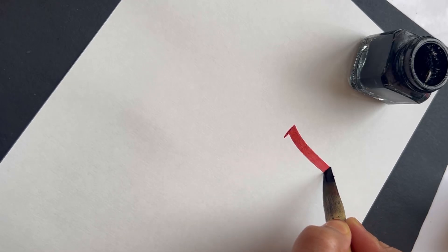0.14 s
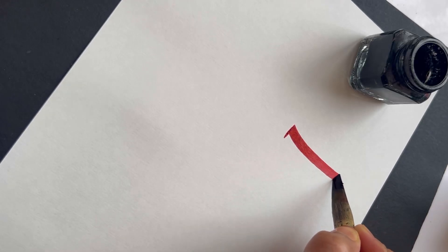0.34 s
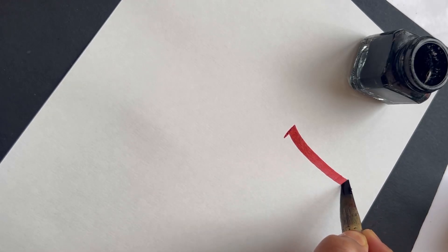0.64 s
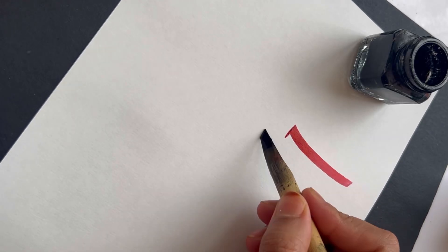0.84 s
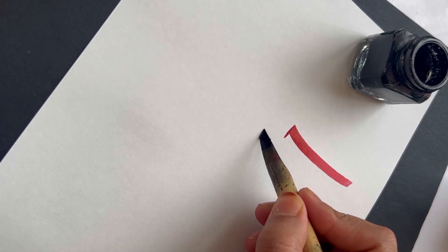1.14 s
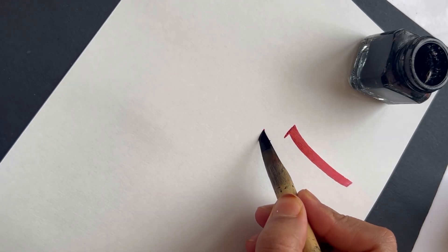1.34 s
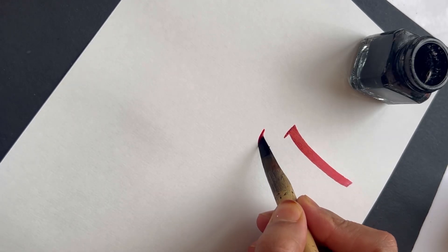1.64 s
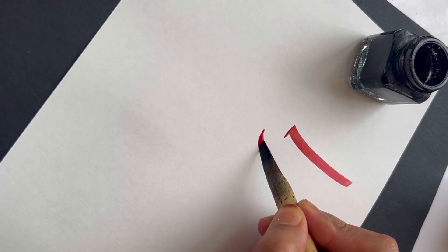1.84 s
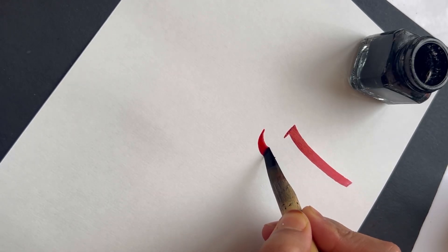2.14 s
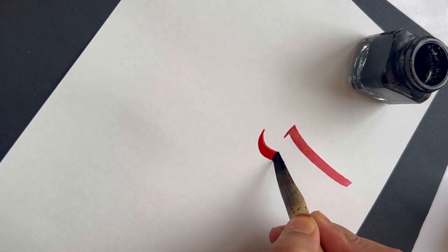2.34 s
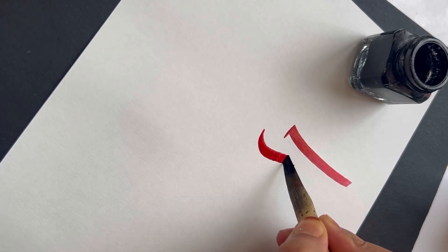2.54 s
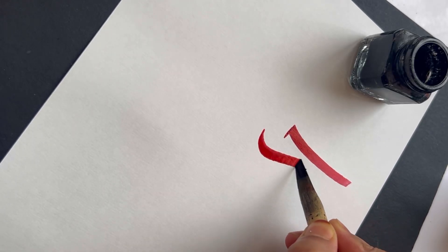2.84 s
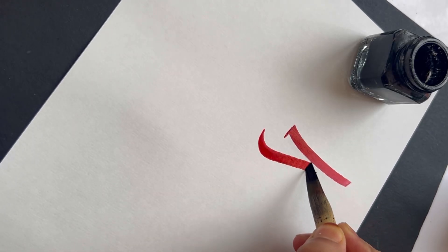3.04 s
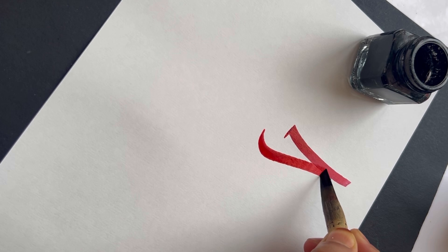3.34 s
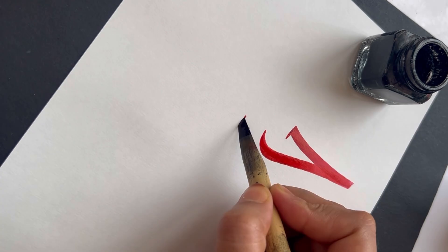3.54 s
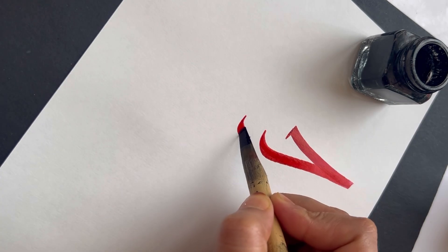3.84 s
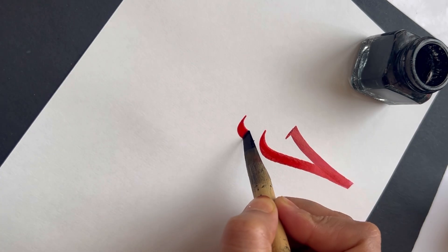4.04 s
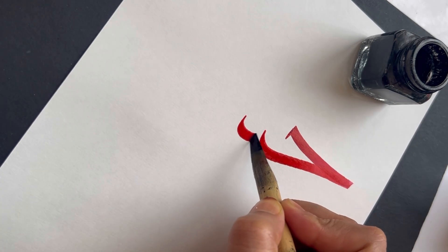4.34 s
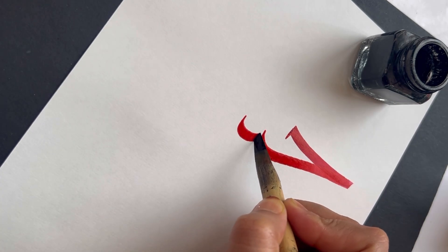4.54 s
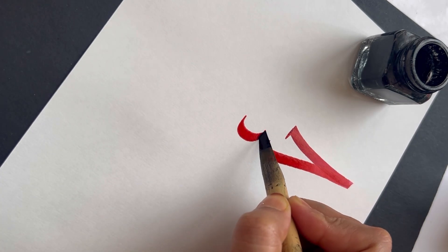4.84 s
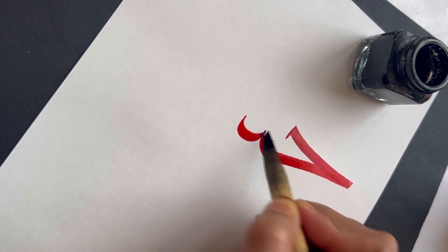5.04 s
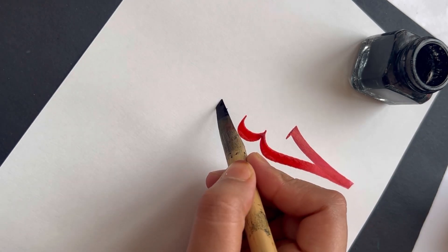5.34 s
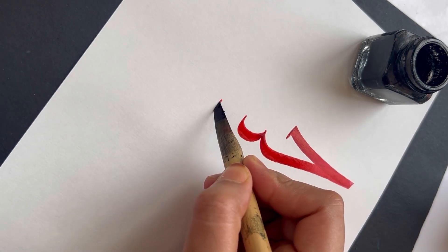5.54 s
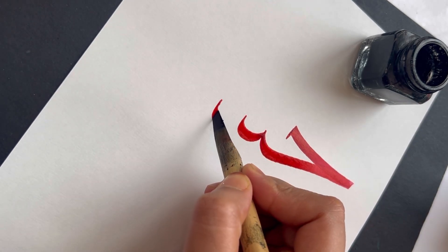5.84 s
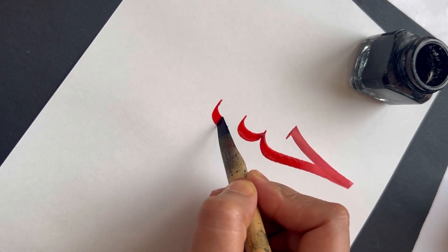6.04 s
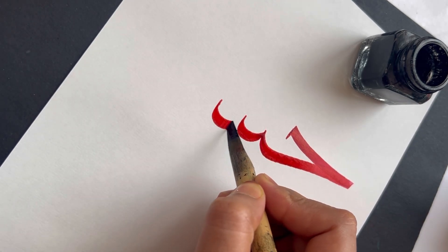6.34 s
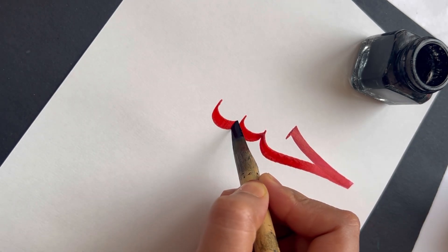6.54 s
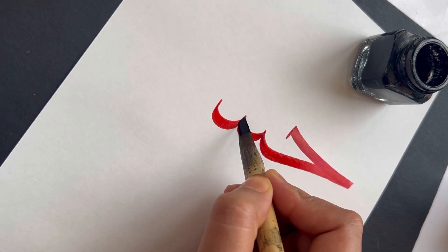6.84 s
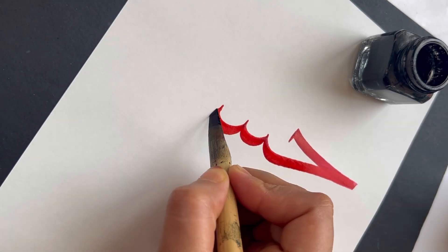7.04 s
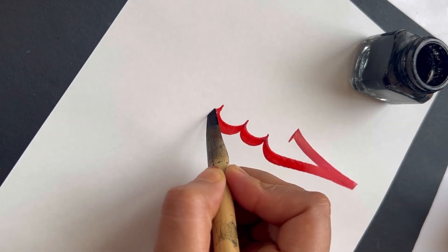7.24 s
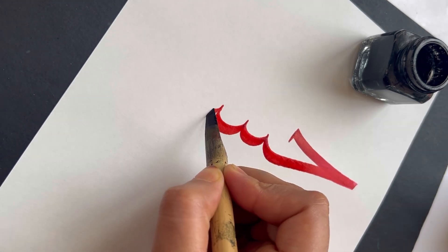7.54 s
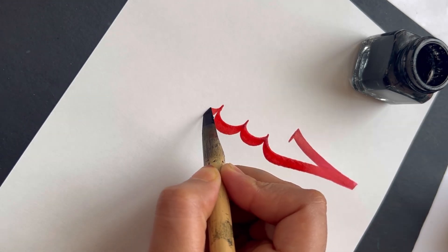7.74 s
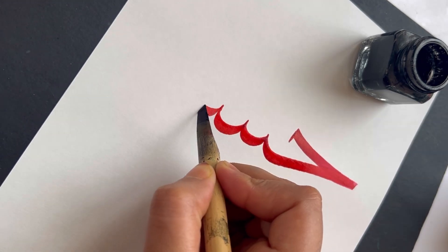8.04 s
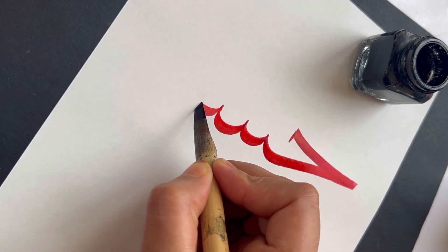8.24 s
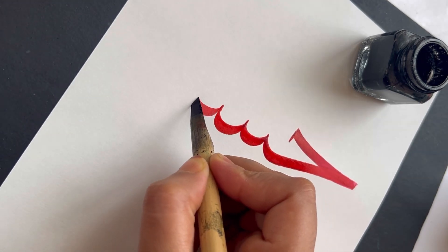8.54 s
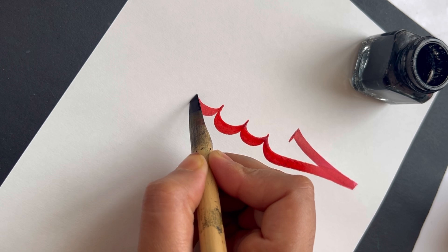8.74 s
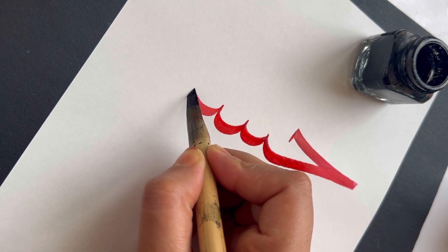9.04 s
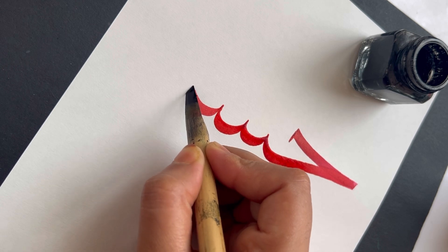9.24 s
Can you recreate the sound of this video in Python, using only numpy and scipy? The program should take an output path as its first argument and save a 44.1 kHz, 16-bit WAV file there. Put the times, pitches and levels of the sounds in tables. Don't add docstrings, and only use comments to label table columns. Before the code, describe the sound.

Close, crisp stick-slip snaps and raspy hisses of a broad wooden nib on paper, first heavy, then lighter and quicker, in a softly humming room.

```python
import sys
import numpy as np
from scipy import signal
from scipy.fft import rfft, irfft, next_fast_len
from scipy.io import wavfile
from scipy.ndimage import map_coordinates

SR = 44100
rng = np.random.default_rng(int(sys.argv[2]) if len(sys.argv) > 2 else 0)


def gain_from_db(level_db):
    decades = np.asarray(level_db, float) / 20
    return 10 ** decades


def to_wav(sig):
    pcm = np.clip(np.atleast_2d(sig), -1, 1) * 32767
    pcm = np.round(pcm).astype(np.int16)
    wavfile.write(sys.argv[1], SR, pcm.T)


N = 414099
TIME = np.arange(N) / SR
SNAP_LAG_S = 0.0007
AIR_TOP_HZ = 13200


def unit(x):
    return x / np.sqrt(np.mean(x ** 2) + 1e-20)


def along(points, hz):
    f, v = np.transpose(points)
    return np.interp(np.log(hz + 1), np.log(f + 1), v)


def wobble(rate_hz):
    knots = rng.standard_normal(int(N * rate_hz / SR) + 4)
    return unit(map_coordinates(knots, [TIME * rate_hz]))


def filtered(x, response):
    m = next_fast_len(N + SR // 2)
    return irfft(rfft(x, m) * response(np.fft.rfftfreq(m, 1 / SR)), m)[..., :N]


def modes(table):
    def response(f):
        total = 0
        for k, (centre, width, db) in enumerate(table):
            damping = 1j * f * width
            total = total + (-1) ** k * gain_from_db(db) * damping / (centre * centre - f * f + damping)
        return total
    return response


def add(track, s, piece):
    part = track[round(s * SR):][:len(piece)]
    part += piece[:len(part)]


def pen():
    strokes = first_stroke() + sweep() + end_stroke() + rebounds() + curls() + flat_strokes() + tail_strokes()
    return strokes + squeak() + drag()


def releases(rows, ring_db, ring_top_db, slide_db):
    s, db = np.transpose(rows)
    ring = -20 * np.log10(gain_from_db(-ring_db) + gain_from_db(db - ring_top_db))
    firm_db, follows = -30, 0.7
    slide = slide_db + follows * (db - firm_db) - db
    return list(zip(s, db, ring, slide))


def slips(table, body, snap_db, rattle_db, rattle_ms, ring, slide_ms, grain):
    blows, rings, slides = np.zeros(N), np.zeros(N), np.zeros(N)
    t = TIME[:SR // 30]
    ring_hz, second, ring_t60_s, scatter = ring
    for s, db, ring_db, slide_db in table:
        start = s + SNAP_LAG_S
        grit = rng.standard_normal((3, len(t)))
        crack = 0.08 * gain_from_db(-60 * t / 0.004) * grit[0]
        crack[0] += 1
        soft_db = 0.3 * (-28 - db)
        pinned = 1 / (1 + (1000 * t / rattle_ms) ** 6)
        rattle = gain_from_db(rattle_db + soft_db - 660 * t) * pinned * grit[1]
        add(blows, start, gain_from_db(db + snap_db) * (crack + rattle))

        nib_hz = ring_hz * (1 + scatter * grit[2, 0])
        phase = 2 * np.pi * nib_hz * t * (1 - 1.2 * t)
        swing = np.sin(phase) + second * gain_from_db(-0.8 * soft_db) * np.sin(2 * phase)
        attack = 1 - np.exp(-t / 0.0011)
        add(rings, start, gain_from_db(db + ring_db + 3.5 - 60 * t / ring_t60_s) * attack * swing)

        u = np.linspace(0, 1, int(slide_ms * SR / 1000))
        slowing = gain_from_db(-4 * u) * np.cos(np.pi / 2 * u) ** 1.3
        add(slides, start, gain_from_db(db + slide_db) * slowing)

    radiated = filtered(blows, lambda hz: modes(body)(hz) / np.sqrt(1 + (hz / 15240) ** 24))
    return radiated + rings + slides * fibres(grain)


# (time [s], snap peak [dB])
FIRST = [
    (0.2299, -20),
    (0.3446, -18.5),
    (0.3611, -31),
    (0.3774, -44),
    (0.4352, -15.5),
    (0.5353, -15),
    (0.5495, -25),
    (0.634, -11.5),
    (0.6653, -20.5),
]
# (centre [Hz], width [Hz], level [dB])
BODY_FIRST = [(2923, 1120, -18), (4380, 330, -15.5), (5520, 860, -8.5), (7150, 360, 0.5), (8970, 530, -4.5),
              (11420, 660, -6), (13500, 1680, -12)]


def first_stroke():
    return slips(releases(FIRST, -22, -26, -63.0), BODY_FIRST, snap_db=18.5, rattle_db=-33.5, rattle_ms=4,
                 ring=(2330, 0.4, 0.033, 0.0088), slide_ms=101, grain=(6700, 700, 8))


# (time [s], snap peak [dB])
SWEEP = [(2.0397, -66), (2.164, -51.5), (2.37, -51), (2.3835, -36), (2.4917, -34), (2.6079, -31),
         (2.7157, -29.5), (2.8274, -30.5), (2.9297, -27.5), (3.043, -54), (3.1313, -62), (3.1622, -56),
         (3.2655, -32), (3.3453, -59), (3.45, -31)]
# (centre [Hz], width [Hz], level [dB])
BODY_SWEEP = [(2790, 440, -1.5), (4520, 420, -13), (5930, 490, 2), (7330, 740, 0), (9300, 480, -0.5),
              (11420, 850, -1.5), (14350, 1260, -8)]


def sweep():
    return slips(releases(SWEEP, -9.0, -12, -58.5), BODY_SWEEP, snap_db=16.5, rattle_db=-25, rattle_ms=3.6,
                 ring=(2340, 0.6, 0.028, 0.0073), slide_ms=113, grain=(7000, 700, 4))


# (time [s], snap peak [dB])
HOOK = [(3.9664, -66), (4.0861, -44), (4.2133, -40), (4.3081, -30), (4.354, -31), (4.4133, -29),
        (4.4567, -41), (4.547, -44), (4.5815, -43.5), (4.6728, -44), (4.7052, -52), (4.7955, -61),
        (4.8329, -62), (5.0584, -67), (5.0888, -60)]
# (time [s], snap peak [dB])
CURL = [(5.441, -55), (5.4794, -57), (5.6121, -63), (6.2437, -26.5), (6.2936, -23.5), (6.3489, -22.5),
        (6.3958, -23), (6.4722, -25.5), (6.5051, -26.5), (6.5909, -33.5), (6.6218, -35), (6.7136, -44.5),
        (6.7411, -52), (6.8114, -59), (6.8398, -59), (6.9865, -61), (7.032, -69), (7.0668, -47),
        (7.1157, -51)]
# (centre [Hz], width [Hz], level [dB])
BODY_MIDDLE = [(2700, 760, -9.5), (4280, 850, -13), (5820, 500, -1), (7630, 1050, -4.5), (8940, 790, -7.5),
               (11140, 800, -7), (13700, 1880, -10.5)]


def curls():
    table = releases(HOOK, -3.2, -28, -65.0) + releases(CURL, -3.5, -30, -65.5)
    return slips(table, BODY_MIDDLE, snap_db=16.5, rattle_db=-20.5, rattle_ms=5.1,
                 ring=(2354, 0.31, 0.022, 0.0066), slide_ms=83, grain=(7000, 700, 4))


# (time [s], snap peak [dB])
BACK = [(7.448, -49), (7.5932, -36.5), (7.6355, -34), (7.7425, -28), (7.7918, -31), (7.864, -27.5),
        (7.9059, -26), (7.9592, -39), (8.003, -29), (8.0477, -26.5), (8.0929, -29), (8.1385, -24),
        (8.1838, -22.5), (8.2278, -25), (8.2713, -30), (8.3198, -35.5), (8.3621, -48), (8.3894, -39.5),
        (8.4109, -40.5), (8.4792, -34.5), (8.5035, -34.5), (8.5232, -50)]
# (centre [Hz], width [Hz], level [dB])
BODY_FLAT = [(3224, 1070, -7), (4670, 540, -0.5), (5910, 540, 9), (7890, 780, 6), (11260, 4600, 5.5),
             (11470, 2070, 10.0), (14010, 830, -8.0)]


def flat_strokes():
    return slips(releases(BACK, 0, -38, -59.5), BODY_FLAT, snap_db=15.5, rattle_db=-34, rattle_ms=5.7,
                 ring=(3690, 0.28, 0.0085, 0.021), slide_ms=53, grain=(5700, 900, 8))


# (time [s], level [dB])
REBOUNDS = [
    (7.871, -39),
    (8.0545, -42),
    (8.1455, -42),
    (8.1895, -39),
    (8.234, -46),
]


def rebounds():
    return slips(releases(REBOUNDS, 0, -38, -77), BODY_FLAT, snap_db=4, rattle_db=-10, rattle_ms=2.3,
                 ring=(3560, 0.05, 0.015, 0.0088), slide_ms=20, grain=(7800, 900, 3))


# (time [s], snap peak [dB])
TAIL = [(8.5812, -51), (8.6197, -33.5), (8.6695, -33.5), (8.7178, -35), (8.7602, -33.5), (8.801, -35),
        (8.843, -34.5), (8.8747, -50), (8.9003, -52), (8.9243, -50), (8.9794, -45), (9.017, -33.5),
        (9.0507, -43.5)]
# (centre [Hz], width [Hz], level [dB])
BODY_TAIL = [(2980, 840, -2.5), (5400, 770, 4), (6800, 1040, 5.5), (7940, 730, 6), (10240, 910, -1.5),
             (11950, 1230, 3.5), (14670, 2410, -2.5)]


def tail_strokes():
    return slips(releases(TAIL, -7, -32, -63.0), BODY_TAIL, snap_db=16.0, rattle_db=-28.5, rattle_ms=2.9,
                 ring=(3600, 0.1, 0.0055, 0.02), slide_ms=54, grain=(7800, 1200, 5))


# (time [s], snap peak [dB])
LAST = [
    (9.1144, -51),
    (9.1561, -30),
    (9.1988, -27),
    (9.2429, -25.5),
    (9.2913, -23),
    (9.3337, -22.5),
    (9.3865, -33),
]
# (centre [Hz], width [Hz], level [dB])
BODY_END = [(3100, 760, -7.5), (5400, 550, -1), (6920, 870, 2.5), (7880, 730, 7), (10240, 910, 0),
            (11930, 1230, 4.0), (14670, 2410, -1.5)]


def end_stroke():
    return slips(releases(LAST, -20, -69, -62.0), BODY_END, snap_db=17.5, rattle_db=-28, rattle_ms=2.4,
                 ring=(3550, 0.1, 0.007, 0.02), slide_ms=50, grain=(7800, 1200, 5))


# (time [s], length [ms], early pitch [Hz], late pitch [Hz], overtones [dB])
CHATTER = [(0.259, 14.7, 2220, 2210, -33.5), (0.272, 8.6, 2243, 2190, -34.5), (0.281, 19, 2057, 2096, -38),
           (0.297, 14.5, 2150, 2250, -33.5), (0.309, 9.7, 2130, 2055, -42.5),
           (0.317, 10.5, 1830, 1750, -50), (0.344, 13.4, 2204, 1990, -41), (0.358, 9, 2213, 2105, -39.5),
           (0.375, 4, 1802, 1730, -45), (0.438, 15, 2200, 2242, -39), (0.45, 19, 2250, 2154, -36.5),
           (0.465, 13, 2154, 2173, -32.5), (0.477, 15, 2064, 2027, -32), (0.491, 5.8, 1846, 1672, -43),
           (0.498, 14, 2083, 2053, -50.5), (0.522, 8, 2057, 2070, -55), (0.536, 11.6, 2300, 2054, -37),
           (0.552, 4.4, 2025, 1800, -34.5), (0.639, 10.5, 2360, 1794, -38.5),
           (0.648, 10.5, 2010, 1940, -42), (0.665, 15, 2225, 2120, -39.5), (0.676, 11.5, 1843, 1800, -48)]


def chatter_rows():
    return [(s, ms, early_hz, late_hz, -57 + 0.28 * (db + 37.5), db, 1)
            for s, ms, early_hz, late_hz, db in CHATTER]


# (time [s], length [ms], start pitch [Hz], fundamental [dB], overtones [dB])
CHIRPS = [(3.03, 8, 2000, -67, -72), (3.125, 6.7, 1950, -67, -72), (3.16, 9.6, 2160, -61.5, -69),
          (3.342, 8.1, 2140, -59, -67), (4.316, 20.4, 2285, -58.5, -53), (4.36, 5.7, 2240, -55, -51),
          (4.458, 8.3, 2330, -55, -66), (4.55, 9, 2330, -62, -69), (4.585, 7.4, 2330, -65, -69),
          (4.676, 6.4, 2330, -69, -69), (6.252, 5.9, 2080, -58, -42), (6.355, 11.4, 2020, -54.5, -47),
          (6.594, 5, 2330, -64, -60), (6.623, 6, 2330, -63, -62), (7.598, 3.3, 2150, -61.5, -66),
          (7.638, 4.5, 2150, -60, -68), (7.745, 4, 2150, -59.5, -62), (7.797, 3.4, 2150, -59, -66),
          (7.868, 8.7, 2090, -60, -60), (7.911, 8, 2090, -59, -52), (7.963, 5.7, 2050, -64, -60),
          (8.008, 2.5, 2050, -59, -46), (8.052, 5.6, 2080, -59, -38), (8.143, 4, 2000, -66, -60)]


def chirp_rows():
    sag_hz, peakiness = 129.5, 3.6
    return [(s, ms, hz, hz - sag_hz, low_db, high_db, peakiness) for s, ms, hz, low_db, high_db in CHIRPS]


# (multiple of pitch, level [dB])
OVERTONES = [(2, -9.5), (3, -0.5), (4, 0), (5, -4.5), (6, -6), (7, -21)]


def squeak():
    s, ms, early_hz, late_hz, low_db, high_db, peaky = np.transpose(chatter_rows() + chirp_rows())
    knots_s = np.ravel([s + ms / 4000, s + 3 * ms / 4000], order="F")
    pitch_hz = np.interp(TIME, knots_s, np.ravel([early_hz, late_hz], order="F"))
    jitter = 0.008 * wobble(220) + 0.02 * wobble(1200)
    phase = 2 * np.pi * np.cumsum(pitch_hz * (1 + jitter)) / SR
    low, high = np.zeros(N), np.zeros(N)
    for start, length_ms, a_db, b_db, power in zip(s, ms, low_db, high_db, peaky):
        swell = np.sin(np.linspace(0, np.pi, int((length_ms + 4) * SR / 1000))) ** 1.7
        add(low, start - 0.002, gain_from_db(a_db + 9.5) * swell)
        add(high, start - 0.002, gain_from_db(b_db + 1) * swell ** power)
    waver_db = 2.6
    stack = sum(gain_from_db(db + waver_db * wobble(250)) * np.sin(k * phase) for k, db in OVERTONES)
    grit = 0.09 * (1 + np.cos(phase)) * fibres((6500, 3000, 3))
    flicker = gain_from_db(1.6 * wobble(300))
    fundamental = np.sin(phase) + 0.26 * np.sin(2 * phase)
    return flicker * (low * fundamental + high * (stack + grit))


# (time [s], length [ms], level [dB])
DRAG = [(0, 124, -60.5), (0.059, 220, -56.5), (.24, 320, -53), (.44, 130, -48), (1.1, 320, -87),
        (2.04, 83, -69.5), (2.14, 350, -71), (2.39, 470, -95), (3.043, 130, -62), (3.132, 200, -63),
        (3.329, 80, -65), (3.78, 260, -79), (3.966, 82, -69), (4.1, 93, -72), (4.781, 84, -77),
        (5.025, 24, -75), (5.525, 28, -79), (6.97, 120, -85), (7.076, 16, -59), (7.65, 110, -81),
        (7.958, 27, -63), (8.41, 140, -80), (7.112, 22, -64), (4.6, 420, -85), (6.62, 460, -83),
        (8.52, 110, -76), (7.75, 870, -75), (8.6, 540, -81), (9.15, 420, -80)]


def drag():
    creep = [(5.615 + k * 0.0964, 160, -88 + 4 * k) for k in range(6)]
    pressure = np.zeros(N)
    for s, ms, db in DRAG + creep:
        u = np.linspace(0, 1, int(ms * SR / 1000))
        add(pressure, max(s, 0), gain_from_db(db) * np.sin(np.pi * u ** 0.5) ** 3.0)
    return pressure * fibres((12000, 2000, 6))


# (frequency [Hz], level [dB])
FIBRES = [(1200, -47), (3000, -6.5), (5000, -4), (6800, -4), (8500, -7.5), (11500, -9), (13600, -12),
          (14150, -27), (15600, -55.5)]


def fibres(grain):
    catches = rng.standard_normal(N) * gain_from_db(1.2 * wobble(900) + 1.2 * wobble(60))
    return unit(filtered(catches, lambda hz: gain_from_db(along(FIBRES, hz)) * (1 + np.abs(modes([grain])(hz)))))


# (frequency [Hz], T60 [s])
ROOM_T60 = [(2000, 0.26), (6000, 0.226), (13500, 0.085), (15000, .03)]


def walls(x, wet_db):
    hz, t, z = signal.stft(rng.standard_normal(SR // 4), SR, nperseg=256)
    decay = gain_from_db(-60 * t / along(ROOM_T60, hz)[:, None])
    tail = signal.istft(z * decay, SR, nperseg=256)[1]
    late = np.pad(x, (250, 0))
    return gain_from_db(wet_db) * signal.fftconvolve(late, tail / np.linalg.norm(tail))[:N]


def fan():
    phase = 2 * np.pi * np.cumsum(75.6 + 0.5 * wobble(4)) / SR
    start_db = -16 * np.clip(1 - TIME / 0.18, 0, 1)
    return gain_from_db(-51 + start_db + 1.8 * wobble(9)) * np.sin(phase)


# (centre [Hz], width [Hz], level [dB])
DUCT_TONES = [(104.1, 3.9, -67.5), (182, 5.7, -63.5)]


def ducts():
    return sum(gain_from_db(db) * unit(filtered(rng.standard_normal(N), modes([(hz, width_hz, 0)])))
               for hz, width_hz, db in DUCT_TONES)


def engine():
    start_s, fade_db_per_s = 0.84, 4.5
    db = -56.5 - fade_db_per_s * (TIME - start_s) + 2.6 * wobble(2.7)
    return (TIME > start_s) * gain_from_db(db) * np.sin(2 * np.pi * 43 * TIME)


# (time [s], length [ms], pitch [Hz], level [dB])
BUMPS = [
    (1.46, 65, 338, -55.5),
    (5.8, 190, 104.6, -52),
]


def bumps():
    track = np.zeros(N)
    for s, ms, hz, db in BUMPS:
        t = TIME[:int(ms * SR / 1000)]
        add(track, s, gain_from_db(db + 5.5) * np.sin(np.pi * t / t[-1]) ** 2 * np.sin(2 * np.pi * hz * t))
    return track


def triple_noise(response):
    return unit(filtered(rng.standard_normal((3, N)), response))


# (frequency [Hz], density [dB per Hz])
AIR = [(30, -91.5), (60, -41.5), (130, -25), (300, -5.5), (660, -14), (780, -25), (1900, -25), (2700, -31),
       (4000, -38), (5200, -47.5), (7500, -56), (13000, -62.5)]
# (centre [Hz], width [Hz], level [dB])
DUCT = [(571, 146, -7), (1071, 190, 2)]


def air():
    def colour(hz):
        return gain_from_db(along(AIR, hz)) * (1 + np.abs(modes(DUCT)(hz))) / (1 + (hz / AIR_TOP_HZ) ** 30)
    swell_db = 0.35 * wobble(1.2) + 0.4 * wobble(6)
    return gain_from_db(-54.5 + swell_db) * triple_noise(colour)


# (frequency [Hz], density [dB per Hz])
RUMBLE = [(30, -120), (55, -6), (62, 4), (105, 1), (135, -1.5), (182, 3), (215, 0), (320, -39),
          (500, -62.5), (800, -120)]


def rumble():
    return gain_from_db(-55) * triple_noise(lambda hz: gain_from_db(along(RUMBLE, hz)))


# (frequency [Hz], density [dB per Hz])
THRUM = [(15, -120), (24, -22), (32, -14), (38, -2), (44, 0), (52, -6), (60, -30), (80, -120)]


def thrum():
    return gain_from_db(-71.5) * triple_noise(lambda hz: gain_from_db(along(THRUM, hz)))


# (frequency [Hz], left lead [rad])
TURN = [(100, 0), (600, -.47), (1050, -.52), (1500, -.3), (2330, 1.63), (2750, 2.16), (3600, 1.0),
        (4900, 1.4), (5770, 3.07), (10200, 9.3), (14850, 15.7), (16100, 17)]


def ports(centre):
    hz_knots, radians = np.transpose(TURN)
    side = np.array([[1], [-1]])
    return filtered(centre, lambda hz: np.exp(0.5j * np.interp(hz, hz_knots, radians) * side))


# (frequency [Hz], share [0-1])
APART = [(60, .02), (250, 0.13), (500, 0.3), (1000, 0.54), (2000, 0.28), (8000, 0.77)]


def own_share(hz):
    return np.clip(along(APART, hz), 0, 0.9)


def scene():
    near = pen()
    echo = filtered(walls(near, wet_db=-25), lambda hz: 1 / (1 + (hz / AIR_TOP_HZ) ** 20))
    shared, *own = air() + rumble() + thrum()
    gone = sum((TIME > s) & (TIME < s + 0.2) for s, _ in CHANGES[:2])
    centre = (near + echo) * (1 - gone) + fan() + ducts() + engine() + bumps()
    centre = centre + filtered(shared, lambda hz: np.sqrt(1 - own_share(hz) ** 2))
    gains = np.array([[1.25], [0.8]])
    return ports(centre) + filtered(np.array(own), lambda hz: own_share(hz) * gains)


def band_limit(x):
    return signal.sosfilt(signal.butter(12, 16800, fs=SR, output="sos"), x)


# (time [s], dip [dB])
CHANGES = [
    (0.735, -10.5),
    (3.52, -13.5),
    (5.09, -11),
    (7.068, -9.5),
]


def record(dry):
    dips_db = sum(db * (TIME > s) * np.clip(1 - (np.abs(TIME - s) / 0.026) ** 2, 0, 1) for s, db in CHANGES)
    heard = filtered(dry * gain_from_db(dips_db), lambda hz: 1 / (1 + (hz / 16500) ** 80))
    return band_limit(heard)


dry = scene()
out = record(dry)
to_wav(out)
```